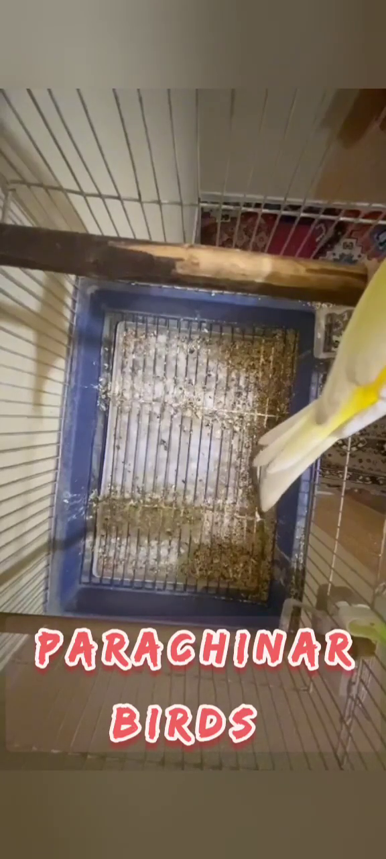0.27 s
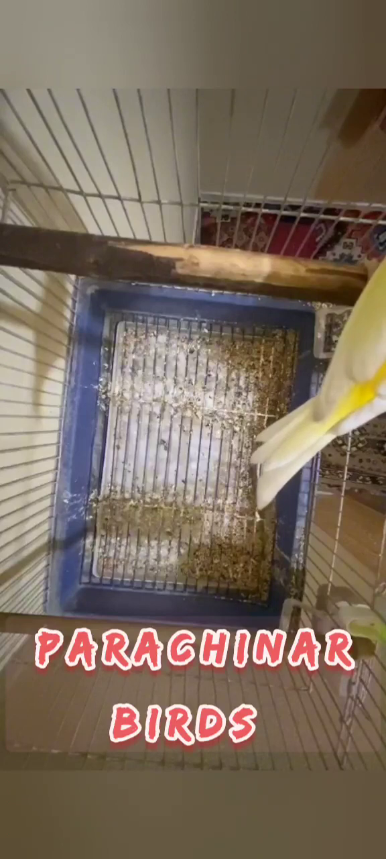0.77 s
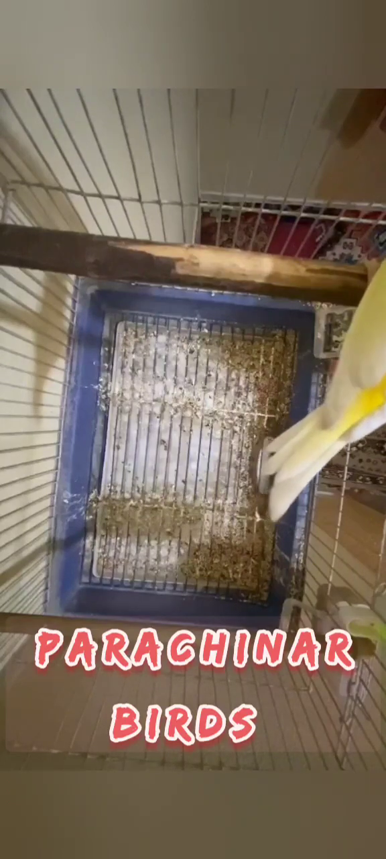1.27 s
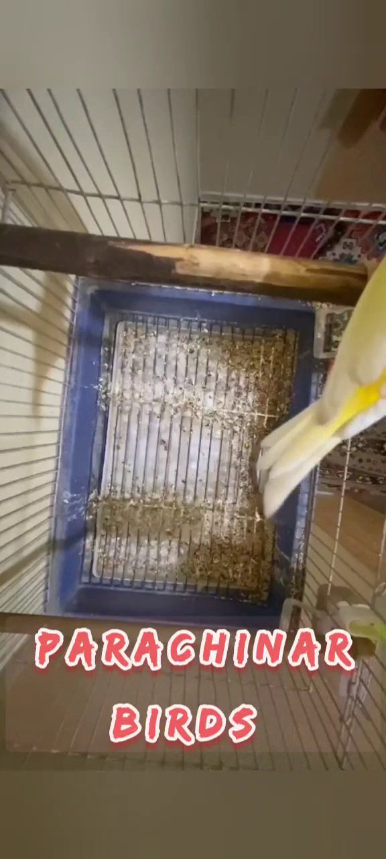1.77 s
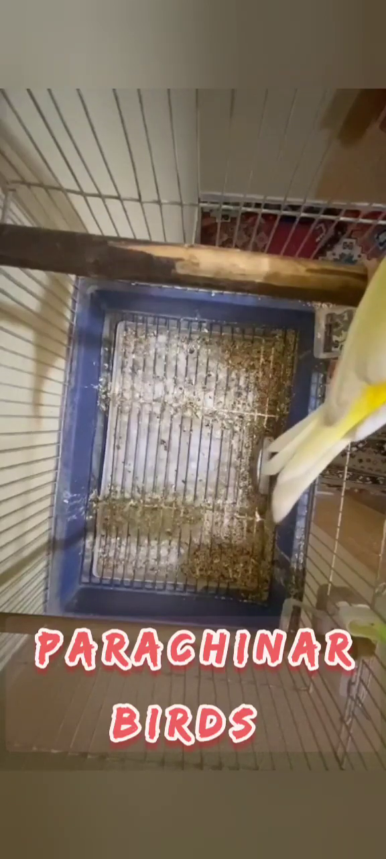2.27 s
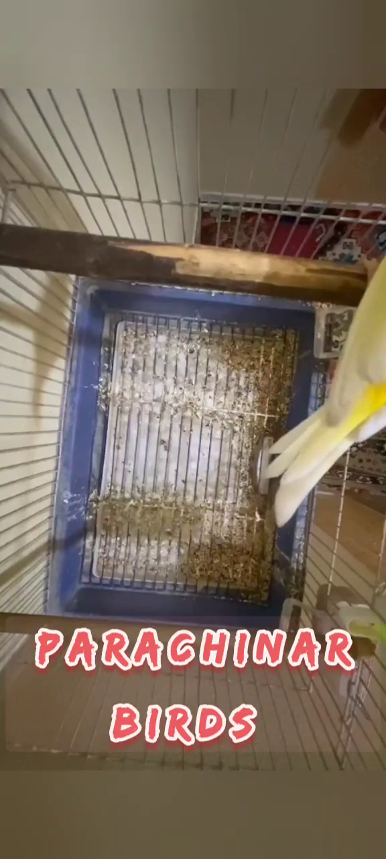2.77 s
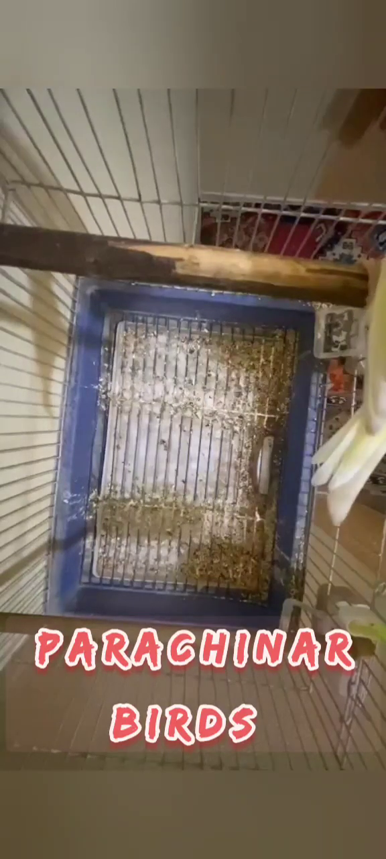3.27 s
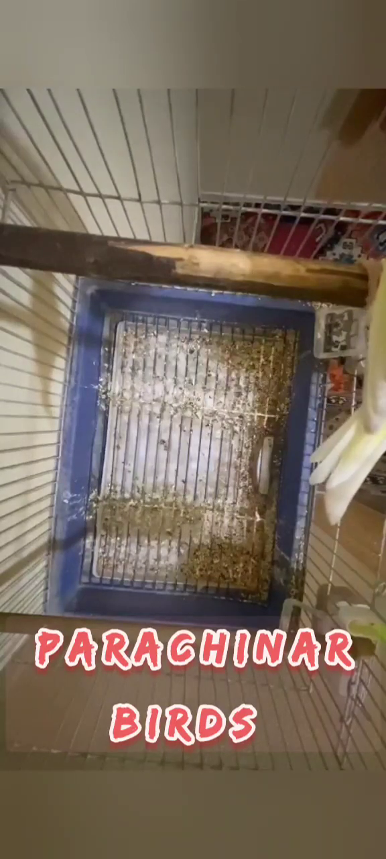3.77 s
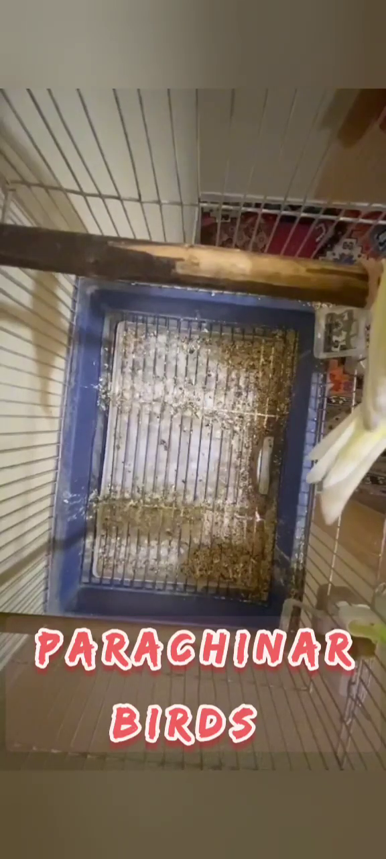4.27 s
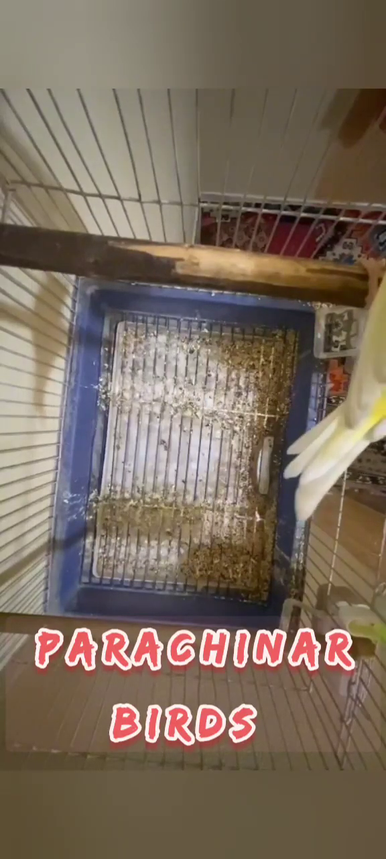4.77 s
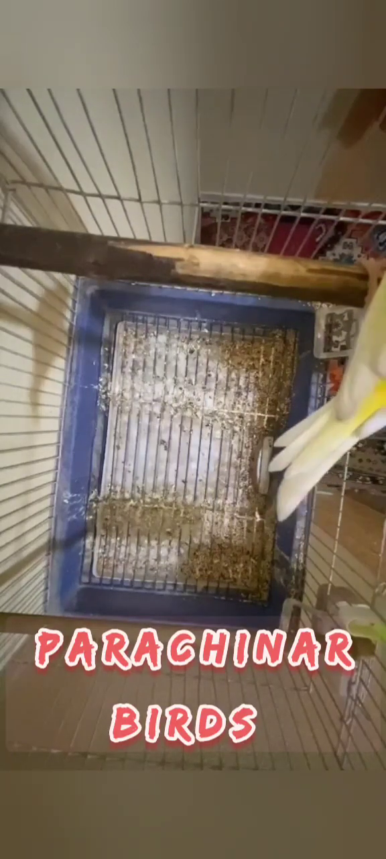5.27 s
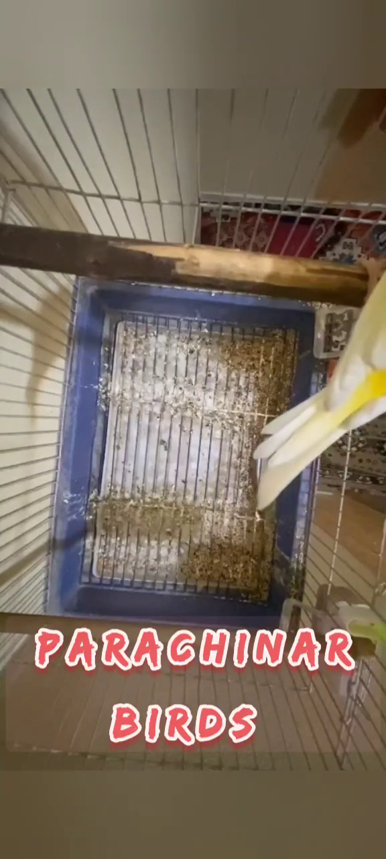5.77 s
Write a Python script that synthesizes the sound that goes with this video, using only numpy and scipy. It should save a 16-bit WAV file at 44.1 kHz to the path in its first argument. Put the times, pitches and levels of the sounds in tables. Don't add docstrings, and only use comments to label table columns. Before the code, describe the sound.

A caged canary sings whistles, a slow trill, two falling slides and a fast buzzy trill over a wavering low hum indoors.

```python
import sys
import numpy as np
from scipy import signal
from scipy.fft import rfft, irfft, next_fast_len
from scipy.io import wavfile
from scipy.ndimage import map_coordinates

SR = 44100
rng = np.random.default_rng(int(sys.argv[2]) if len(sys.argv) > 2 else 0)


def transcribe(signal):
    frames = np.atleast_2d(signal).T
    limited = np.clip(frames, -1, 1)
    pcm = np.round(limited * 32767).astype(np.int16)
    wavfile.write(sys.argv[1], SR, pcm)


def voltage_ratio(decibels):
    exponent = np.asarray(decibels, float) / 20
    return 10 ** exponent


N = 265173

# time from the accent in [s], pitch in [Hz], level in [dB],
# half-pitch voice in [dB].
DROP_SHAPE = [(-.0225, 2340, -12, -32.5), (-.019, 2310, -2.5, -53), (-.013, 2420, -8, -67),
              (-.008, 2300, -1, -52.5), (-.003, 1980, 0.5, -18.5), (.0005, 1510, 2, -22),
              (.004, 1380, 0, -21)]
DROP_OVERTONES = [-2.5, -13.5, -36, -48]


def unit(x):
    return x / np.sqrt(np.mean(x ** 2) + 1e-20)


def along(points, hz):
    f, v = np.transpose(points)
    return np.interp(np.log(hz + 1), np.log(f + 1), v)


def wobble(rate, size):
    knots = rng.standard_normal(max(int(size * rate / SR) + 4, 160))
    return map_coordinates(knots, [np.arange(size) * rate / SR])


def filtered(x, response):
    m = next_fast_len(N + SR // 4)
    return irfft(rfft(x, m) * response(np.fft.rfftfreq(m, 1 / SR)), m)[..., :N]


def coloured(x, colour):
    return filtered(x, lambda hz: voltage_ratio(along(colour, hz)))


def noise(spectrum, channels):
    return unit(coloured(rng.standard_normal((channels, N)), spectrum))


def add(song, rows, tones_db, edge=0.0036, shake=0.0071, dull=0, flutter_db=2.5, rasp=0.023):
    s, hz, db, half_db = np.transpose(rows)
    start = max(round((s[0] - edge) * SR), 0)
    at = np.arange(start, min(round((s[-1] + edge) * SR), N))
    t = at / SR
    size = len(t)
    hoarse = np.clip(voltage_ratio(0.99 * np.interp(t, s, half_db)), 0, 1)
    level_db = np.interp(t, s, db)
    unsteady = 1 + shake * wobble(90, size) + rasp * hoarse * wobble(300, size)
    phase = 2 * np.pi * np.cumsum(np.interp(t, s, hz) * unsteady) / SR
    fade = np.clip(np.minimum(t - s[0] + edge, s[-1] + edge - t) / abs(edge), 0, 1) ** 2
    turns = rng.uniform(0, 2 * np.pi, (len(tones_db), 2))
    effort_db = dull * (level_db - level_db.max())
    whole, between = np.zeros((2, size))
    for k, d in enumerate(tones_db):
        level = voltage_ratio(d + k * effort_db + flutter_db * wobble(59.2, size))
        whole += level * np.sin((k + 1) * phase + turns[k, 0])
    for k, d in enumerate([-34] + tones_db[1:]):
        level = voltage_ratio(d + 2 * flutter_db * wobble(220, size))
        between += level * np.sin((k + .5) * phase + turns[k, 1])
    song[at] += np.sqrt(2) * fade * voltage_ratio(level_db) * (whole + 1.2 * hoarse * between)


def phrase(song, events, shapes, effort_db, late=0, opening=1):
    *lead, (accent, accent_tones) = shapes
    for k, (s, db, lead_db, bend) in enumerate(events):
        shift = np.array([s + late, 0, db + effort_db, 0])
        rows = np.array(accent) * [1, bend if k else opening, 1, 1] + shift
        add(song, rows, accent_tones, edge=.0013, flutter_db=.7)
        if k == 0:
            continue
        for shape, tones_db in lead:
            rows = np.array(shape) * [1, bend ** .3, 1, 1] + shift + [0, 0, lead_db, 0]
            add(song, rows, tones_db, edge=.002, flutter_db=5.0, shake=0.013)


def beak(x):
    # frequency in [Hz], gain in [dB].
    beak_colour = [(1500, -2), (2000, 2.5), (2500, -3), (2900, -0.5), (3170, -7.5), (3450, 2.5), (3750, -8),
                   (4350, -7), (4760, 6.5), (5200, -7.5)]
    return coloured(x, beak_colour)


def whistles():
    # time in [s], pitch in [Hz], level in [dB], half-pitch voice in [dB].
    whistle_rows = [
        [(0, 1117, -38.5, -44.5), (.08, 1110, -37, -32), (.16, 1123, -34.5, -30.5), (.2, 1127, -41, -5.5),
         (.24, 1148, -35.5, -9), (.265, 1166, -46, -4.5), (.285, 1213, -43, -11.5)],
        [(.38, 989, -37.5, -27), (.394, 1086, -43, -37.5), (.43, 1109, -40.5, -32), (.54, 1095, -39.5, -38.5),
         (.6, 1062, -38.5, -17.5), (.645, 1100, -41, -2), (.69, 1078, -44, -5), (.706, 1156, -42.5, -19),
         (.725, 1150, -42.5, -12.5)],
        [(.848, 992, -38, -35.5), (.864, 1083, -44.5, -33), (.9, 1082, -37, -29), (.96, 1092, -38.5, -48.5),
         (1.03, 1063, -39, -36), (1.1, 1053, -41.5, -27.5), (1.118, 1051, -40.5, -1.5),
         (1.165, 1110, -45, -10.5), (1.195, 1167, -53.5, -16.5)],
        [(1.308, 991, -37, -32), (1.325, 1064, -44, -31.5), (1.35, 1099, -38, -42), (1.42, 1067, -41, -56.5),
         (1.5, 1039, -37.5, -39.5), (1.545, 1030, -40.5, -5.5), (1.575, 1056, -39, -7.5),
         (1.618, 1061, -46, -16.5)],
    ]
    whistle_overtones = [-5.5, -11.5, -11.5, -24.5, -25.5, -26.5, -31, -39, -42, -39]
    song = np.zeros(N)
    for rows in whistle_rows:
        add(song, rows, whistle_overtones, edge=0.0044, dull=0.26, rasp=0.035, flutter_db=1.69)
    return song


def pickups():
    # accent in [s], level in [dB], lead-in in [dB] (none sung here), pitch as a [ratio].
    pickup_drops = [
        (0.342, -29.5, 3, 0.85),
        (0.808, -31.5, 3, 0.99),
        (1.266, -30.5, 0, 0.99),
    ]
    song = np.zeros(N)
    phrase(song, pickup_drops, [(DROP_SHAPE, DROP_OVERTONES)], effort_db=-1.7)
    return beak(song)


def slow_trill():
    # start in [s], accent in [dB], lead-in over the accent in [dB], pitch as a [ratio].
    slow_accents = [(1.727, -39, -1, 1.01), (1.785, -35, -10, 0.96), (1.841, -36, 3.5, 0.92),
                    (1.898, -34.5, 1, 0.94), (1.957, -36, 1, 0.96), (2.016, -34.5, -3.5, 1),
                    (2.073, -34, -0.5, 0.99), (2.133, -33.5, 1.5, 0.99), (2.192, -33.5, -1.5, 0.99),
                    (2.251, -34.5, -1.5, 0.99), (2.309, -33, -1, 1.06), (2.369, -31, -1, 1.01),
                    (2.428, -32, -2.5, 1.09), (2.488, -32.5, -4, 1.03), (2.548, -31, -1.5, 1.04),
                    (2.608, -30.5, -4, 1.06), (2.669, -31.5, -1.5, 1.09)]
    # time from the accent in [s], pitch in [Hz], level in [dB],
    # half-pitch voice in [dB].
    murmur_shape = [(-.029, 678.6, -26, -41), (-.023, 684, -11.5, -30.5), (-.017, 660, -19, -42),
                    (-.006, 655.8, -13, -45)]
    flick_shape = [(-.0032, 845.6, -13, -39.5), (-.001, 1134, -2.5, -38.5), (.0005, 1400, -0.5, -35.5),
                   (.0024, 1650, -10, -39.5)]
    murmur_overtones = [-4.5, -7, -13, -13, -17, -23.5, -29, -39, -39, -33.5]
    flick_overtones = [-1, -13.5, -26.5, -31.5, -38.5]
    # frequency in [Hz], gain in [dB].
    gape_colour = [(900, 0.5), (1400, -2.5), (2000, 4), (2500, -1), (2900, -3), (3400, 0), (3800, -0.5),
                   (5000, -2)]
    song = np.zeros(N)
    shapes = [(murmur_shape, murmur_overtones), (flick_shape, flick_overtones)]
    phrase(song, slow_accents, shapes, effort_db=-1.5, late=.002, opening=1.1)
    return coloured(song, gape_colour)


def slide(rows):
    end_hz, plunge_hz, plunge_s, settle_hz, settle_s = 1585, 1150, .015, 530, .105
    plunge_blunt = 2.1
    s, db, half_db = np.transpose(rows)
    t = np.linspace(0, s[-1] - s[0], num=80)
    plunge = plunge_hz * np.exp(-(t / plunge_s) ** plunge_blunt)
    hz = end_hz + plunge + settle_hz * np.exp(-t / settle_s)
    at = s[0] + t
    return np.transpose([at, hz, np.interp(at, s, db), np.interp(at, s, half_db)])


def slides():
    # time in [s], level in [dB], half-pitch voice in [dB].
    slide_levels = [
        [(4.325, -55, -30), (4.333, -39, -57), (4.346, -39, -67.5), (4.36, -47.5, -60.5), (4.4, -44.5, -42),
         (4.44, -44, -61.5), (4.485, -39.5, -50), (4.51, -41.5, -59), (4.553, -39, -40)],
        [(4.909, -44, -31.5), (4.919, -33, -75), (4.93, -43, -52), (4.95, -42, -57), (4.99, -40.5, -52),
         (5.03, -41.5, -33), (5.047, -35, -45), (5.068, -48, -46), (5.08, -35.5, -47), (5.128, -45, -38)],
    ]
    slide_overtones = [-6.5, -18, -33, -44.5, -50.5]
    song = np.zeros(N)
    for rows in slide_levels:
        add(song, slide(rows), slide_overtones, edge=0.0018, dull=0.02, flutter_db=2.8)
    return song


def low_notes():
    # time in [s], pitch in [Hz], level in [dB], half-pitch voice in [dB].
    low_rows = [
        [(4.548, 903, -60, -20.5), (4.575, 783, -58, -30), (4.6, 792, -56, -55), (4.63, 768, -50.5, -51),
         (4.66, 848, -49.5, -37), (4.7, 840.5, -46, -40), (4.74, 806.5, -51.5, -26), (4.76, 741, -50.5, -35.5),
         (4.78, 722, -54.5, -51)],
        [(5.116, 865, -57, -14), (5.132, 646, -55.5, -21), (5.16, 797, -50.5, -32.5),
         (5.2, 833.5, -49.5, -29.5), (5.225, 837, -44.5, -10), (5.25, 915, -52, -4.5), (5.275, 863, -56, -13),
         (5.295, 788, -46, -10.5), (5.312, 745, -65, -28.5)],
    ]
    low_overtones = [-3, -4, -5.5, -1.5, -8, -18, -21, -18.5, -21, -26.5, -54]
    song = np.zeros(N)
    for rows in low_rows:
        add(song, rows, low_overtones, edge=0.0067, dull=0.42, rasp=0.045, shake=0.0079)
    return song


def fast_trill():
    # start in [s], accent in [dB], lead-in over the accent in [dB], pitch as a [ratio].
    fast_accents = [(5.4169, -43.5, -1, 1.01), (5.4578, -40.5, -1, 1.01), (5.5016, -40.5, 7, 1.1),
                    (5.5453, -36, 1.5, 1.01), (5.5889, -35, -0.5, 1.01), (5.633, -36, -0.5, 1.01),
                    (5.678, -36, 7, 1.1), (5.7228, -35, 1.5, 1.01), (5.767, -34, -6.5, 1.01),
                    (5.811, -34.5, -0.5, 1.01), (5.8575, -34.5, 3, 1.01), (5.9027, -34.5, 2, 1.01),
                    (5.9472, -34.5, -4, 1.01), (5.9899, -34, -4.5, 1.01)]
    # time from the accent in [s], pitch in [Hz], level in [dB],
    # half-pitch voice in [dB].
    pickup_shape = [(-.015, 808, -12, -41), (-.0122, 1070, -7.5, -40), (-.0103, 1346, -14.5, -38),
                    (-.0085, 1600, -22, -45)]
    snap_shape = [(-.0003, 1300, -6, -4.5), (.0007, 1430, -2.5, 3.5), (.0017, 1580, -2.5, -5.5),
                  (.003, 1855, -16, -14)]
    pickup_overtones = [-1, -11.5, -28, -42]
    snap_overtones = [-1.5, -4.5, -24, -25]
    song = np.zeros(N)
    shapes = [(pickup_shape, pickup_overtones), (snap_shape, snap_overtones)]
    phrase(song, fast_accents, shapes, effort_db=-0.5, late=0.0019)
    return beak(song)


def canary():
    return whistles() + pickups() + slow_trill() + slides() + low_notes() + fast_trill()


def room(x):
    # frequency in [Hz], t60 in [s].
    room_decay = [(500, 0.42), (1300, 0.28), (3500, 0.28), (8000, 0.21)]
    # delay in [s], level in [dB].
    wall_echoes = [
        (.0042, -14),
        (.0095, -12.5),
        (.0145, -19),
        (.021, -21.5),
    ]
    # frequency in [Hz], gain in [dB].
    left_colour = [(700, 2.5), (1100, 3), (1500, 2), (2100, -17), (2400, 3), (2700, -4), (3400, -3.5),
                   (8000, -9.5)]
    right_colour = [(700, -0.5), (1100, 0.5), (1500, -9), (2100, -13), (2400, 0), (2700, 5.5), (3400, -5.5),
                    (8000, -7.5)]
    hz, t, z = signal.stft(rng.standard_normal((2, SR // 2)), SR, nperseg=256)
    decay = voltage_ratio(-60 * t / along(room_decay, hz)[:, None])
    tail = signal.istft(z * decay, SR, nperseg=256)[1]
    build_up = np.clip(np.arange(tail.shape[1]) / SR / .009, 0, 1)
    answer = voltage_ratio(-5) * tail / np.linalg.norm(tail[0]) * build_up
    for s, db in wall_echoes:
        answer[[0, 1], round(s * SR) + rng.integers(0, 40, 2)] += voltage_ratio(db)
    straight = filtered(x, lambda hz: voltage_ratio([along(left_colour, hz), along(right_colour, hz)]))
    return voltage_ratio(2.0) * (straight + signal.fftconvolve(x[None], answer, axes=1)[:, :N])


def lingering():
    earlier_drop = (.124, -20.5)
    before, db = earlier_drop
    song, sung_at = np.zeros(N), .03
    add(song, np.array(DROP_SHAPE) + [sung_at, 0, db, 0], DROP_OVERTONES)
    gone = round((sung_at + before) * SR)
    return np.pad(room(song)[:, gone:], ((0, 0), (0, gone)))


def cage(x):
    # resonance in [Hz], width in [Hz], left level in [dB], right level in [dB].
    cavity_rings = [(1972, 24, 15.5, 9.5), (2359, 68, 7, 6.5), (2797, 42, -3.5, 4.5), (1281, 50, -1, -2),
                    (1757, 52, 7.5, 0.5), (1110, 33, -6.5, -19.5)]

    def response(hz):
        total = 1
        for c, width, *db in cavity_rings:
            ring = 1j * hz * width / (c * c - hz ** 2 + 1j * hz * width)
            total = total * (1 + voltage_ratio(db)[:, None] * ring)
        return total

    return filtered(x, response)


def perch():
    # start in [s], t60 in [s], rustle in [dB], knock in [dB], thump in [dB].
    shuffles = [
        (.27, 0.45, -83, -62, -55),
        (.93, 0.41, -64.5, -66, -58.5),
        (1.117, .5, -68, -63, -60),
        (1.14, .6, -81.5, -56.5, -62),
        (1.195, 0.65, -89.5, -64, -49.5),
        (1.73, 1.6, -99, -69.5, -59.5),
        (2.65, 0.33, -57, -51.5, -67),
        (2.775, 0.86, -95, -59.5, -50),
        (5.72, 0.63, -63.5, -58, -60),
        (5.962, 0.25, -64.5, -79, -76),
    ]
    jolts = [
        (1.548, 0.67, -79.5, -45.5, -45.5),
        (2.757, 0.2, -53, -57, -62),
        (4.05, 0.44, -83.5, -84, -62.5),
    ]
    # frequency in [Hz], density in [dB per Hz].
    rustle_spectrum = [(1500, -49.5), (3000, -2), (5000, 6.5), (7500, 6), (9500, -4.5), (11500, -31),
                       (13000, -67)]
    knock_spectrum = [(120, -31), (250, -19), (500, -4), (900, -8.5), (2500, -21.5), (4000, -48)]
    thump_spectrum = [(20, -23), (50, -6.5), (150, -9.5), (260, -3), (330, -9.5), (420, -55)]
    after = np.arange(SR) / SR
    swells = np.zeros((3, N + SR))
    for moves, rise_s in ((shuffles, 0.021), (jolts, 0.0045)):
        for s, t60, *levels_db in moves:
            swell = np.clip(after / rise_s, 0, 1) * voltage_ratio(-60 * np.clip(after - rise_s, 0, None) / t60)
            start = round(s * SR)
            swells[:, start:start + SR] += voltage_ratio(levels_db)[:, None] * swell
    rustle, knock, thump = swells[:, :N]
    common, left, right = noise(knock_spectrum, channels=3)
    knocking = knock * (0.76 * common + 0.69 * np.array([left, right]))
    rustling = rustle * noise(rustle_spectrum, channels=2)
    grain = voltage_ratio(0.98 * wobble(150, N))
    return grain * (rustling + knocking) + thump * noise(thump_spectrum, channels=1)


def tone(rows, sway_db, rate):
    t = np.arange(N) / SR
    s, hz, db = np.transpose(rows)
    level = voltage_ratio(np.interp(t, s, db) + sway_db * wobble(rate, N))
    return np.sqrt(2) * level * np.sin(2 * np.pi * np.cumsum(np.interp(t, s, hz)) / SR)


def machines():
    # time in [s], pitch in [Hz], level in [dB].
    hum_curve = [(0, 104.4, -59), (.1, 103.1, -46), (.5, 104.6, -41.5), (.95, 102.9, -52.5),
                 (1.45, 103.6, -37), (1.94, 104.6, -47.5), (2.08, 102.3, -57.5), (2.5, 102.6, -48),
                 (2.96, 100.8, -52.5), (3.1, 103.7, -61.5), (3.24, 102.4, -45.5), (3.38, 99.14, -54),
                 (3.601, 101.6, -40.5), (4.07, 99.15, -59.5), (4.401, 102.4, -45), (4.6, 99.2, -54),
                 (5.15, 99.04, -55), (5.5, 99.1, -61)]
    whine_curve = [(0, 158.4, -77), (.4, 157.5, -63), (.8, 157.9, -66), (1.2, 157, -62.5),
                   (1.6, 158.5, -64), (1.92, 159.5, -50.5), (2.1, 158.5, -68), (2.5, 158, -69),
                   (2.8, 158.1, -58.5), (3.05, 158.9, -61), (3.3, 158, -62), (3.5, 157.4, -60),
                   (3.8, 158.5, -62.5), (4.3, 158.6, -65.5), (4.8, 156.7, -62.5), (5.3, 155.1, -63),
                   (6, 156.5, -60.5)]
    # frequency in [Hz], density in [dB per Hz].
    rumble_spectrum = [(60, -48.5), (85, -13), (101, 4), (130, -6), (158, -9), (180, -13.5), (198, -12),
                       (250, -19.5), (360, -27), (420, -55)]
    floor_spectrum = [(15, -29), (25, 4), (33, -6), (52, 10), (62, 6), (80, 14), (95, -49.5)]
    hum = tone(hum_curve, sway_db=1.3, rate=5.3)
    whine = tone(whine_curve, sway_db=6.0, rate=22)
    rumble = voltage_ratio(-58 + 3.5 * wobble(7.4, N)) * noise(rumble_spectrum, channels=1)
    return hum + whine + rumble + voltage_ratio(-62.5) * noise(floor_spectrum, channels=1)


def air():
    # frequency in [Hz], density in [dB per Hz].
    air_spectrum = [(200, -6), (300, -17), (420, -21.5), (500, -11.5), (630, -19.5), (1000, -27.5),
                    (1400, -24), (2070, -30.5), (4000, -30.5), (7400, -57), (8300, -51.5), (10000, -32),
                    (12000, -57), (16000, -63.5)]
    common, left, right = noise(air_spectrum, channels=3)
    level = voltage_ratio(-74 + 6.5 + 1.2 * wobble(4, N))
    return level * (0.56 * common + 0.36 * np.array([left, right]))


def scene():
    bird = cage(room(canary()) + lingering())
    return bird + perch() + machines() + air()


def low_pass(x):
    return signal.sosfilt(signal.butter(12, 11700, fs=SR, output="sos"), x)


def record(dry):
    # frequency in [Hz], phase in [radians].
    port_phase = [(190, -.03), (340, -.5), (690, -3.0), (1100, -4.3), (1500, -4.2), (1700, -4.8),
                  (2000, -4.0), (2700, -3.1), (3000, -2.7), (3400, -5.1), (3900, -3.4), (5000, -6.2),
                  (9000, -6.0)]
    # frequency in [Hz], gain in [dB].
    mic_colour = [(2000, 0.5), (2700, 2.5), (3500, -2.5), (3850, 3.5), (4200, -0.5), (4600, -4.5),
                  (5000, 2.5), (6200, 2), (7400, -2), (8300, -11.5), (9300, -1.5), (11500, -10.5)]

    def ports(hz):
        turn = np.exp(.5j * along(port_phase, hz))
        return np.array([turn, 1 / turn]) * voltage_ratio(along(mic_colour, hz))

    return low_pass(filtered(dry, ports))


dry = scene()
out = record(dry)
transcribe(out)
```